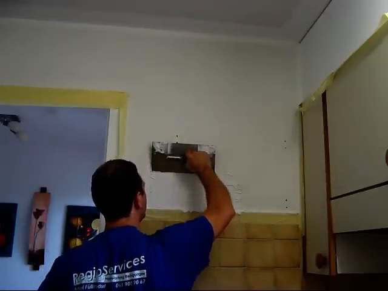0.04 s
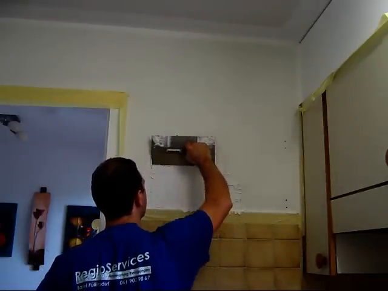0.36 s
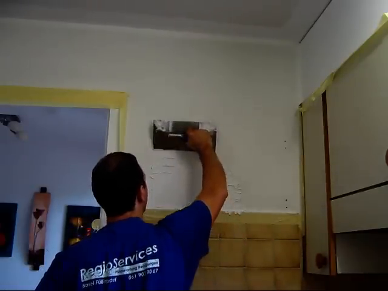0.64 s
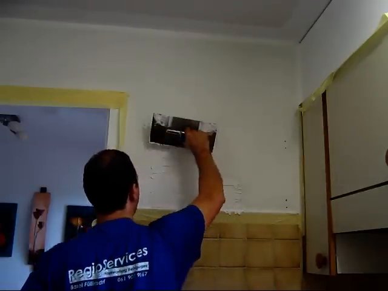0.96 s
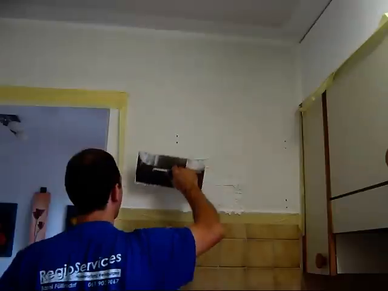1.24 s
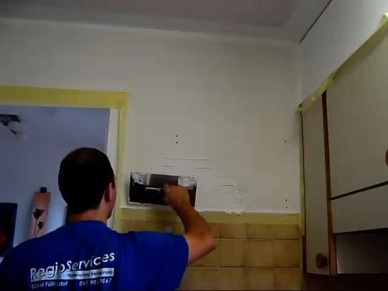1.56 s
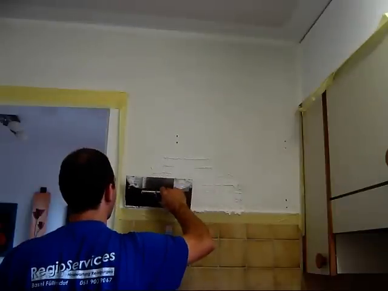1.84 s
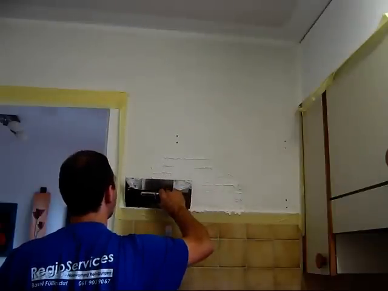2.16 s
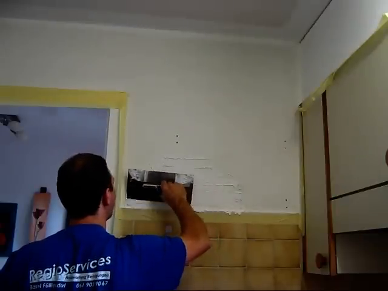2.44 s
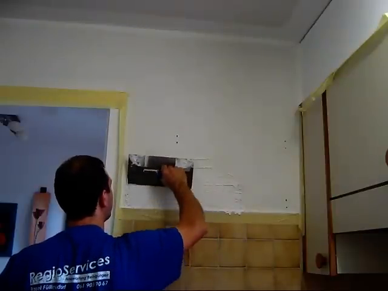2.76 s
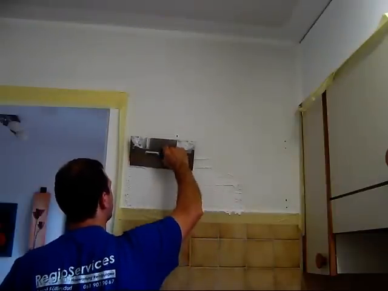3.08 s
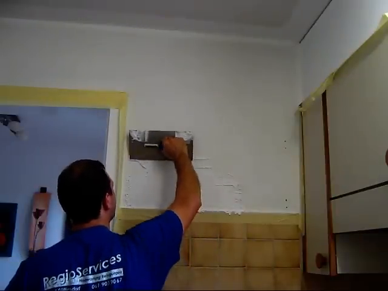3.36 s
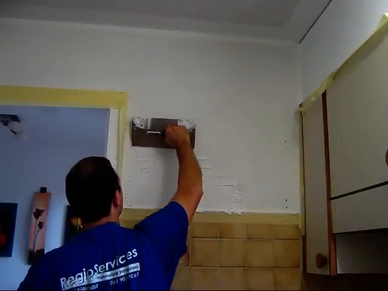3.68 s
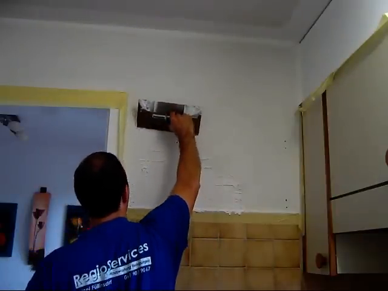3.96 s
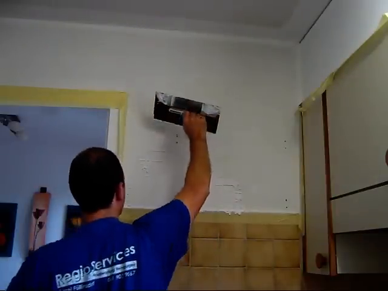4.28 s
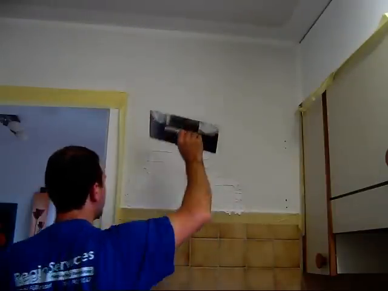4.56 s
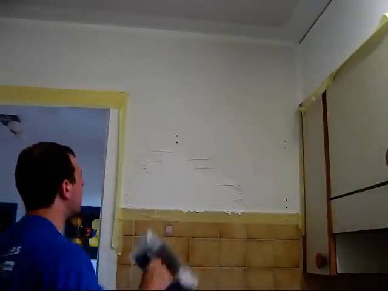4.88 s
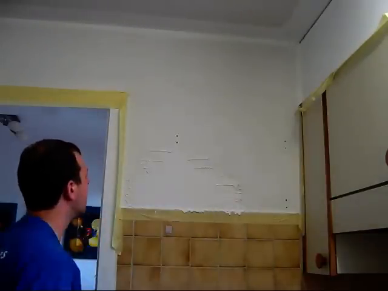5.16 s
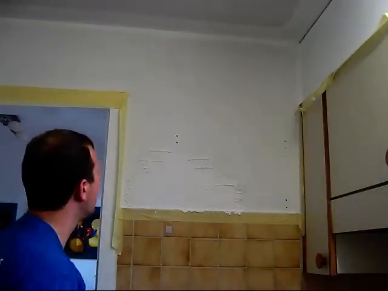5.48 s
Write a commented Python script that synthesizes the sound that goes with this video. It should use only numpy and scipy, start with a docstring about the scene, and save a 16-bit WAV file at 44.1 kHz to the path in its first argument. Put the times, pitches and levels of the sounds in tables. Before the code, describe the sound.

A steel trowel scrapes a plastered wall in two runs of gritty, ringing pushes, followed by light handling knocks in a bare room.

```python
"""A steel trowel scrapes up a plastered wall in two long runs of short pushes, in a bare kitchen.
Sand grains hiss under its edge; the blade rings, judders, squeaks and clacks, and the wall drones
where it is pressed hard. Then the trowel is lifted off and handled with light knocks and rustles.
The room rings after the tool, and a small camera's coarse converter adds fizz to the quiet sounds."""
import sys
import numpy as np
from scipy import signal
from scipy.fft import rfft, irfft
from scipy.io import wavfile
from scipy.ndimage import uniform_filter1d

SR = 44100
rng = np.random.default_rng(int(sys.argv[2]) if len(sys.argv) > 2 else 0)


def int16_out(signal):
    """Quantize to a 16-bit WAV file."""
    q = np.round(np.clip(np.atleast_2d(signal).T, -1, 1) * 32767)
    wavfile.write(sys.argv[1], SR, q.astype(np.int16))


N = 252252
TIME = np.arange(N) / SR


def gain_of(db):
    return 10 ** (np.asarray(db) / 20)


def unit_rms(x):
    return x / np.sqrt(np.mean(x ** 2) + 1e-20)


def curve_at(points, hz):
    freqs, values = np.transpose(points)
    return np.interp(np.log(hz + 1), np.log(freqs + 1), values)


def colour(x, eq, tilt_db=0, size=4096):
    """Minimum-phase EQ, tilted by tilt_db per octave above 200 Hz; comes out at unit RMS."""
    hz = abs(np.fft.fftfreq(size, 1 / SR))
    log_gain = np.log(gain_of(curve_at(eq, hz) + tilt_db * np.log2(np.maximum(hz, 200))))
    taps = np.fft.ifft(np.exp(np.conj(signal.hilbert(log_gain)))).real
    return unit_rms(signal.fftconvolve(x, taps[:size // 2])[:len(x)])


def resonate(x, hz, widths_hz):
    """Resonators in series, one per width, all following the pitch hz; comes out at unit RMS."""
    carrier = np.exp(2j * np.pi * np.cumsum(hz * np.ones(len(x))) / SR)
    for width in widths_hz:
        pole = np.exp(-np.pi * width / SR)
        x = (carrier * signal.lfilter([1 - pole], [1, -pole], x / carrier + 1e-18)).real
    return unit_rms(x)


def wander(rate_hz, size=8192):
    """Smooth random modulation of unit size, rolling off above rate_hz."""
    hz = np.arange(size // 2 + 1) * SR / N
    spectrum = rfft(rng.standard_normal(size)) * np.exp(-(hz / rate_hz) ** 2)
    return np.interp(TIME, np.linspace(0, N / SR, size), unit_rms(irfft(spectrum, size)))


def grains(per_s, spread_db):
    """Clicks at random moments: many small, a few large."""
    sizes = gain_of(spread_db * np.minimum(rng.exponential(1, N), 4))
    return unit_rms(sizes * rng.choice([-1, 1], N) * (rng.random(N) < per_s / SR))


# tone of the noise floor: (frequency [Hz], level [dB])
HISS_EQ = [(25, -5), (100, -3.5), (180, 0.5), (270, 2.5), (500, -1), (1000, -6), (2000, -7.5), (3200, -7.5),
           (5000, -11.5), (8000, -28)]
def hiss(db=-61.5):
    """A faint, steady bed of dull noise."""
    return gain_of(db) * colour(rng.standard_normal(N), HISS_EQ)


# reverb time of the bare kitchen: (frequency [Hz], t60 [s])
ROOM_DECAY = [(100, 0.33), (250, 0.46), (600, 0.54), (1200, 0.61), (3000, 0.62), (6000, 0.58),
              (12000, 0.75)]
def room(x, direct_db=-2.5, tail_db=-2.13, tails=6, predelay_s=.004):
    """Direct sound plus crossfading tails: the echoes change as the blade moves along the wall."""
    out = gain_of(direct_db) * x
    sends = np.array([wander(12) for _ in range(tails)])
    for send in sends / np.linalg.norm(sends, axis=0):
        echoes = rng.choice([-1., 1.], SR) * (rng.random(SR) < 3500 / SR)
        hz, t, bands = signal.stft(echoes, SR, nperseg=256)
        decay = gain_of(-60 * t / curve_at(ROOM_DECAY, hz)[:, None])
        tail = signal.istft(bands * decay, SR, nperseg=256)[1]
        tail = np.r_[np.zeros(round(predelay_s * SR)), tail] / np.linalg.norm(tail)
        out += gain_of(tail_db) * signal.fftconvolve(x * send, tail)[:N]
    return out


# spells of hard pressure on the wall: (start [s], end [s], drive level [dB])
HARD_PRESSES = [(0.727, 0.845, -46.5), (3.63, 3.734, -54), (3.854, 4.105, -45)]
# the wall's low modes: (frequency [Hz], relative level [dB], t60 [s])
WALL_MODES = [(215, -2, 0.85), (236.5, -5.5, 0.78), (285, -6.5, 0.04), (356, -7, 0.1)]
def wall_drone():
    """Low modes swell while the blade presses; the lowest two linger afterwards."""
    pressure = sum(gain_of(db) * ((TIME > start) & (TIME < end)) for start, end, db in HARD_PRESSES)
    pressure *= gain_of(1.4 * wander(25))
    drifting_time = np.cumsum(1 + 0.0051 * wander(3.9)) / SR
    out = np.zeros(N)
    for hz, db, t60 in WALL_MODES:
        pole = np.exp(-np.log(1000) / (t60 * SR))
        swell = signal.lfilter([1 - pole], [1, -pole], pressure)
        out += np.sqrt(2) * gain_of(db) * swell * np.sin(2 * np.pi * (hz * drifting_time + rng.random()))
    return out


# tone of the brushing: (frequency [Hz], level [dB])
RUSTLE_EQ = [(80, -26), (180, -6), (260, -4.5), (400, -3.5), (900, 5.5), (1500, 2), (2500, 1.5),
             (4000, -4.5), (5700, -5), (8000, -25)]
# handling moves: (peak time [s], length [s], level [dB], brightness [dB/octave])
RUSTLES = [(1.524, 0.1, -61, -1), (4.324, 0.11, -45.5, -0.5), (4.561, 0.16, -48, -2),
           (4.742, 0.17, -48.5, -1), (4.885, 0.096, -41.5, 2), (5.139, 0.098, -53.5, 4.5),
           (5.38, 0.72, -59.5, 1.5), (5.512, 0.091, -41.5, 0.5)]
def rustles():
    """Hand, sleeve and blade brush past things: soft swells of fine friction grains."""
    out = np.zeros(N)
    for peak, length, db, tilt_db in RUSTLES:
        swell = np.exp(-(2 * (TIME - peak) / length) ** 2)
        out += gain_of(db) * swell * colour(grains(per_s=2100, spread_db=4.5), RUSTLE_EQ, tilt_db)
    return out


# tone of a hit's sharp attack: (frequency [Hz], level [dB])
TICK_EQ = [(200, -13.5), (1000, -2.5), (2000, -8.5), (3000, -1.5), (4000, 2), (4800, 2.5), (5700, 1.5),
           (7000, -12.5), (9000, -36.5)]
def hits(cues, damping, size=4410):
    """Each hit is a short rattle ringing one resonance (width = damping * pitch), with a tick on top."""
    out, t = np.zeros(N), np.arange(size) / SR
    decay = np.exp(-t / .011)
    body = signal.butter(2, [300, 2600], "bandpass", fs=SR, output="sos")  # a small, softly struck thing
    for start, db, hz, tick_db in cues:
        rattle = (t == 0) + .16 * rng.standard_normal(size) * decay
        ring = unit_rms(signal.sosfilt(body, resonate(rattle, hz, (damping * hz, 1350))))
        tick = colour(rng.standard_normal(size) * decay, TICK_EQ)
        hit = gain_of(db) * (ring + gain_of(tick_db) * tick)
        slot = out[round(start * SR):][:size]
        slot += hit[:len(slot)]
    return out


# knocks in the hand: (time [s], level [dB], ring pitch [Hz], tick relative to ring [dB])
HAND_KNOCKS = [(4.274, -53.5, 1504, -10.5), (4.502, -52, 950, 2.5), (4.546, -51, 1020, -2),
               (4.686, -50, 1305, -9), (4.706, -53, 1545, 5), (4.865, -55.5, 249, -2.5),
               (4.958, -45, 785, -17), (4.965, -50, 1314, -24), (5.484, -43, 1520, -17.5)]
def hand_knocks():
    """The lifted tool, held free in the hand, gives light, well-damped knocks."""
    return hits(HAND_KNOCKS, damping=0.39)


# clacks on the wall, and brief free rings as the blade lifts off: (time [s], level [dB], ring pitch [Hz], tick
# relative to ring [dB])
EDGE_CLACKS = [(0.703, -53, 1120, 9.5), (0.747, -40.5, 1060, -18.5), (0.781, -38.5, 990, -15.5),
               (.82, -41.5, 1437, -20), (2.385, -35.5, 1084, -1.5), (3.771, -35, 1020, -4.5),
               (4.082, -41, 1350, -25)]
def edge_clacks():
    """The edge strikes the wall and the blade rings briefly; as the blade lifts off, it also rings free for a
    moment."""
    return hits(EDGE_CLACKS, damping=.21)


def thud(start_s=2.384, db=-48, hz=55, decay_s=0.017):
    """The flat of the blade lands and pushes the wall once."""
    t = np.maximum(TIME - start_s, 0)
    return gain_of(db) * np.sin(2 * np.pi * hz * t) * np.exp(-t / decay_s)


# squeaks of the edge: (peak time [s], length [s], pitch [Hz], level [dB])
SQUEAKS = [(2.085, 0.058, 1146, -43.5), (2.099, 0.05, 857, -48.5), (2.154, 0.04, 1157, -40),
           (2.252, 0.029, 1132, -45), (3.37, .13, 2860, -42)]
def squeaks():
    """A lightly loaded edge sticks and slips in step with one mode of the blade."""
    out = np.zeros(N)
    for peak, length, hz, db in SQUEAKS:
        cycles = np.cumsum(hz * (1 + 0.0121 * wander(89))) / SR
        swell = np.exp(-(2 * (TIME - peak) / length) ** 2)
        out += gain_of(db) * swell * np.sqrt(2) * np.sin(2 * np.pi * cycles)
    return out


# tone of the slipping edge: (frequency [Hz], level [dB])
JUDDER_EQ = [(60, -57.5), (170, -43), (250, -9.5), (315, -17), (380, -4.5), (480, -3.5), (650, -3),
             (850, 3), (1000, -2), (1400, -4), (1700, -9.5), (3000, -37.5)]
def edge_judder(slips, note_hz):
    """Slips of the edge make a midrange chatter, with a hollow note groaning under it."""
    groan = resonate(grains(per_s=460, spread_db=2), note_hz, widths_hz=(150, 350))
    return gain_of(0.27) * colour(slips, JUDDER_EQ) + gain_of(-6) * groan


def blade_ring(drive, ring_hz, catch_db=2, catch_rate_hz=45):
    """Friction rings the blade at a wavering pitch, in spurts as the edge catches."""
    pitch = ring_hz * (1 + 0.019 * wander(35))
    ring = resonate(drive, pitch, widths_hz=(82, 420))
    power = abs(uniform_filter1d(ring ** 2, size=900))
    limited = unit_rms(ring / np.sqrt(power + 0.58))  # friction limits the swing
    return limited * gain_of(catch_db * wander(catch_rate_hz) - 1.13)


# tone of the sand: (frequency [Hz], level [dB])
GRIT_EQ = [(100, -24.5), (300, -22), (900, -2), (1400, -2), (1650, -2), (2100, 2), (3000, 0), (4000, -2.5),
           (5400, -4), (7000, -14.5), (10000, -39.5)]
# high modes of the steel: (frequency [Hz], width [Hz], level relative to the sand [dB])
STEEL_MODES = [(2484, 53, -22.5), (2860, 82, -18.5)]
def sand_grit(sand):
    """Grains hiss under the edge and ring a thin metallic sheen out of the steel."""
    sheen = sum(gain_of(db) * resonate(sand, hz, (width, 1200)) for hz, width, db in STEEL_MODES)
    return gain_of(3) * (colour(sand, GRIT_EQ) + sheen)


def push_envelope(spans, levels_db, lag_s, attack_s, rise_db, release_s):
    """One layer's gain over all pushes: each fades in, leans a little louder, and lets go."""
    power = np.zeros(N)
    for (start, length), db in zip(spans, levels_db):
        t = TIME - start - lag_s
        attack = np.sin(np.pi / 2 * np.clip(t / attack_s, 0, 1)) ** 2
        hold = gain_of(db + rise_db * (np.clip(t / length, 0, 1) - .5))
        release = np.exp(-np.maximum(t - length, 0) / release_s)
        power += (attack * hold * release) ** 2
    return np.sqrt(power)


# pushes of the arm; the blade's bend sets its ring, its angle the judder's hollow note:
# (start [s], length [s], grit fader [dB], ring fader [dB], judder fader [dB], ring [Hz], note [Hz])
PUSHES = [(-.05, 0.094, -27.5, -34, -45.5, 1030, 580), (.035, .1, -32.5, -32, -36, 1006, 532),
          (0.189, 0.12, -30, -34.5, -45.5, 1100, 550), (0.318, 0.094, -38.5, -35, -47, 1073, 550),
          (0.458, 0.056, -28.5, -28.5, -34, 1084, 603), (0.499, 0.047, -37, -24.5, -34, 1066, 613),
          (0.709, 0.084, -33, -27, -31.5, 1009, 817), (2.042, 0.13, -51.5, -50, -50, 1100, 870),
          (2.21, .09, -49.5, -52.5, -46.5, 1043, 566), (2.373, 0.028, -31, -26.5, -36, 1060, 770),
          (2.434, 0.094, -29.5, -27, -37.5, 1086, 790), (2.551, 0.12, -32.5, -33.5, -38.5, 1053, 827),
          (2.682, 0.22, -31.5, -33.5, -40.5, 1068, 770), (2.92, 0.12, -32, -32.5, -40, 1084, 787),
          (3.01, 0.1, -31.5, -31.5, -34.5, 1016, 750), (3.142, 0.22, -31.5, -29, -36, 1046, 756),
          (3.391, 0.28, -38.5, -40.5, -44, 1022, 738), (3.487, 0.065, -31.5, -24.5, -29, 1063, 747),
          (3.556, 0.084, -43, -36.5, -29, 1033, 688), (3.758, 0.14, -33, -26.5, -30.5, 1064, 830),
          (3.964, .1, -36, -28.5, -34, 1028, 745)]
def trowel():
    """Grains and slips drive three layers: sand is swept off first, the blade rings, the edge digs in."""
    start, length, grit_db, ring_db, judder_db, ring_hz, note_hz = np.transpose(PUSHES)
    spans, middle = list(zip(start, length)), start + length / 2
    bumps = gain_of(0.66 * wander(40) - 1.01)  # uneven plaster shakes all layers together
    sand = grains(per_s=4500, spread_db=2.5) * gain_of(1.4 * wander(155))  # breaks loose in clumps
    slips = grains(per_s=700, spread_db=2)
    grit = sand_grit(sand)
    grit *= push_envelope(spans, grit_db, lag_s=0, attack_s=.0312, rise_db=.5, release_s=.0132)
    ring = blade_ring(slips + 0.94 * sand, np.interp(TIME, middle, ring_hz))
    ring *= push_envelope(spans, ring_db, lag_s=.011, attack_s=.021, rise_db=.69, release_s=.02)
    judder = edge_judder(slips, np.interp(TIME, middle, note_hz))
    judder *= push_envelope(spans, judder_db, lag_s=.018, attack_s=.031, rise_db=.75, release_s=.042)
    return bumps * (grit + ring + judder)


def scene():
    """Tool and handling go through the room; hiss, wall drone and thud stay dry."""
    bed = hiss()
    tool = trowel() + squeaks() + edge_clacks() + hand_knocks() + rustles()
    return (bed + room(tool) + wall_drone() + thud())[None]


def record(dry, converter_hz=11025, step=1 / 256, jitter_s=4.6e-6, smooth_hz=10600, edge_hz=12600):
    """The microphone thins the deep bass; a slow, coarse converter turns quiet sound into fizz."""
    thin = signal.sosfilt(signal.butter(1, 20, "highpass", fs=SR, output="sos"), dry[0])
    clock = np.arange(0, N / SR, 1 / converter_hz)
    crushed = step * np.floor(np.interp(clock, TIME, thin) / step + .3)  # silence sits .3 up a step
    # straight lines between samples mirror the blade's ring faintly into the treble
    joined = np.interp(TIME + jitter_s * rng.standard_normal(N), clock, crushed)
    smooth = signal.sosfilt(signal.butter(4, smooth_hz, fs=SR, output="sos"), joined)
    band_limit = signal.firwin(201, edge_hz, window=("kaiser", 9), fs=SR)
    return signal.oaconvolve(smooth, band_limit, "same")[None]


dry = scene()
out = record(dry)
int16_out(out)
```